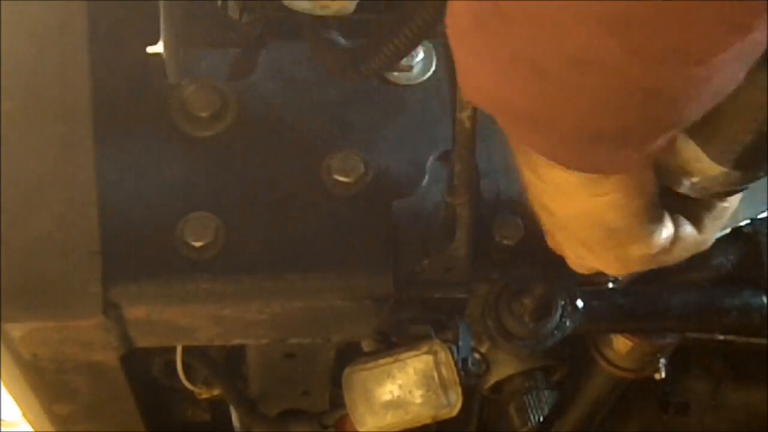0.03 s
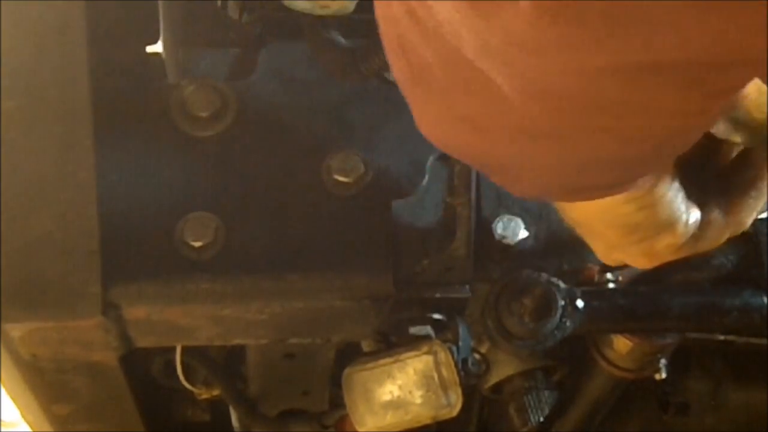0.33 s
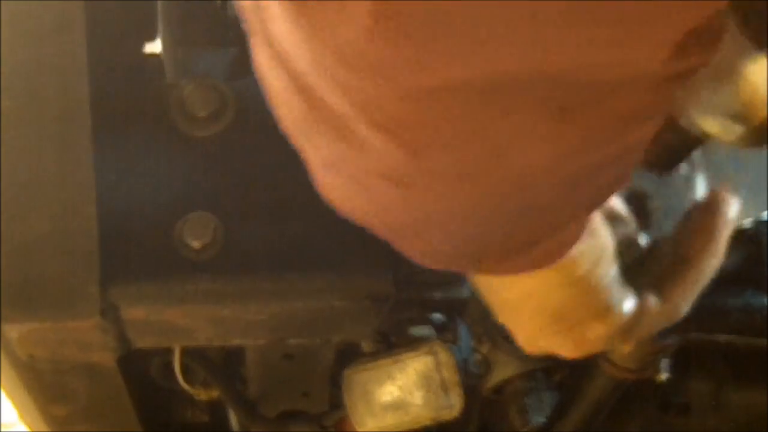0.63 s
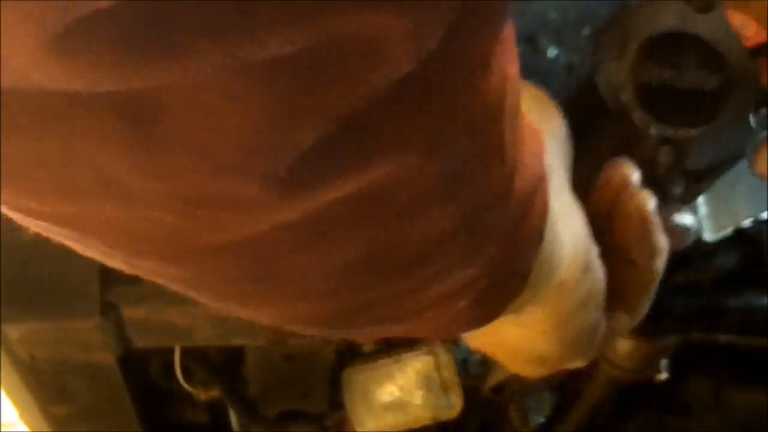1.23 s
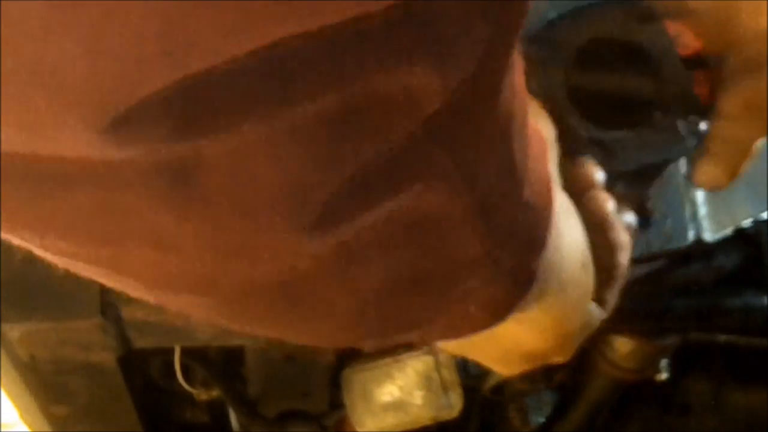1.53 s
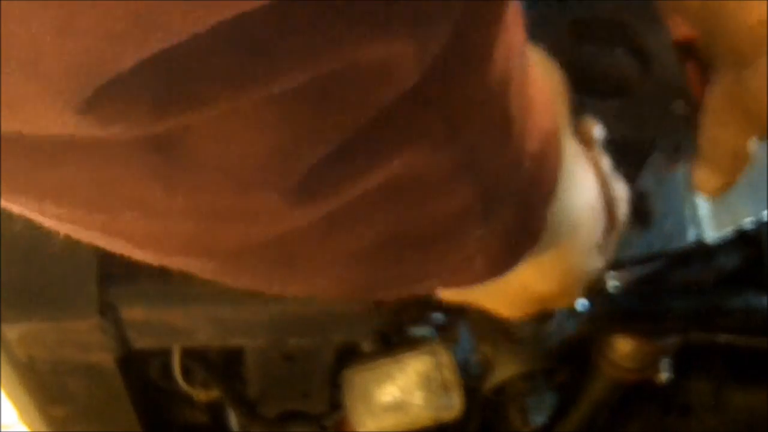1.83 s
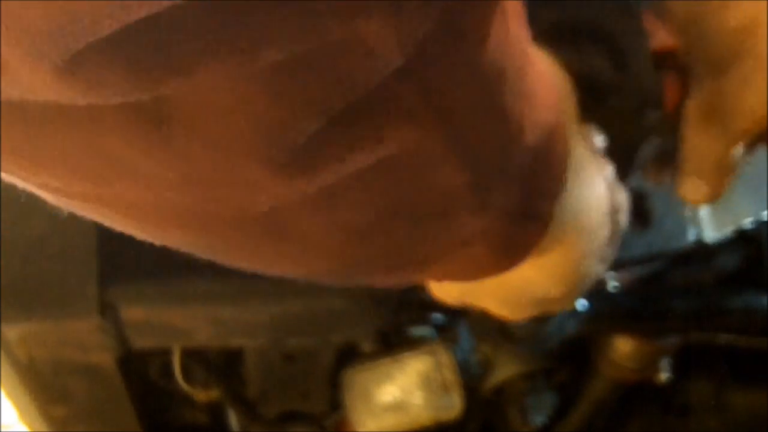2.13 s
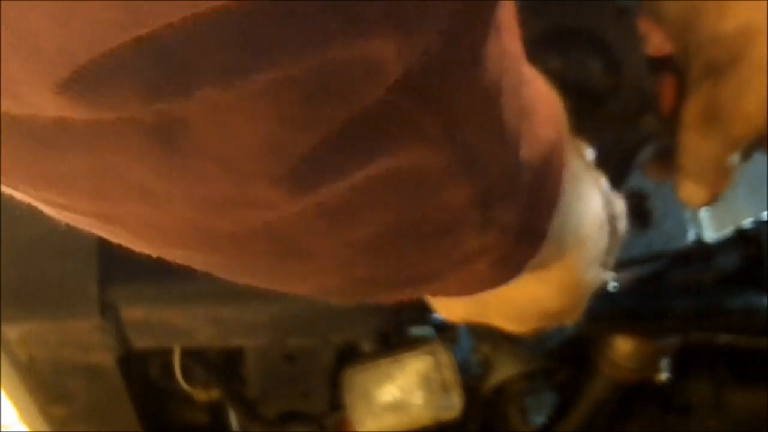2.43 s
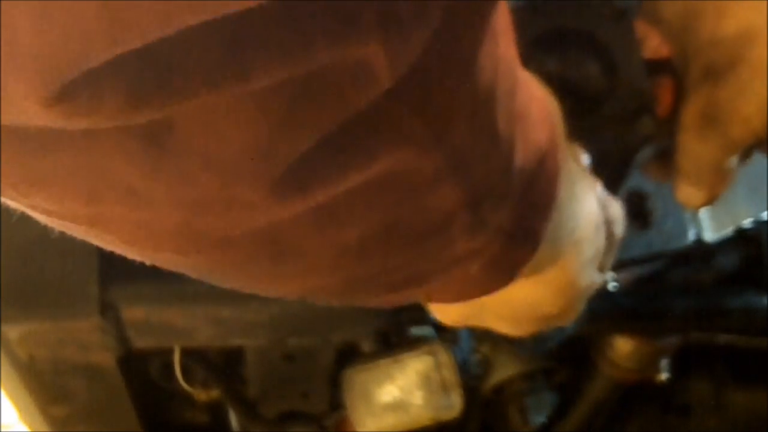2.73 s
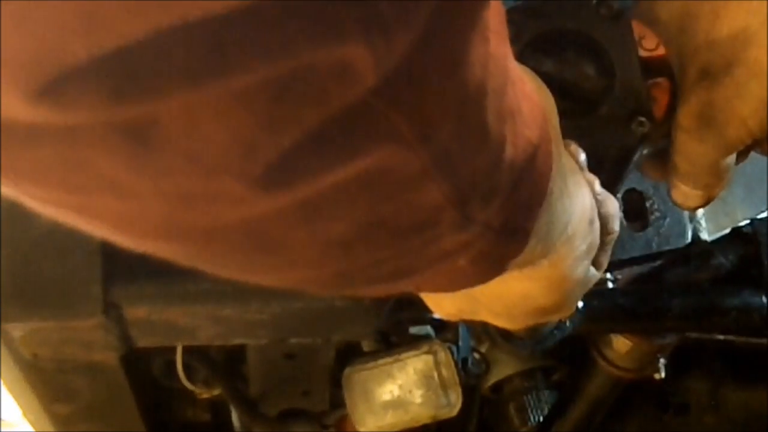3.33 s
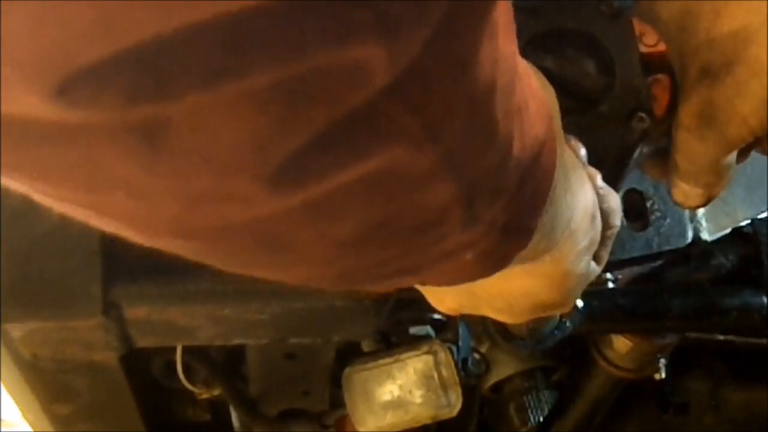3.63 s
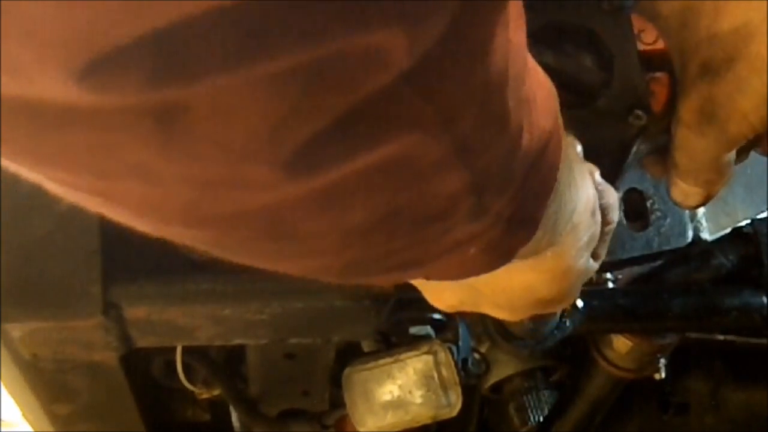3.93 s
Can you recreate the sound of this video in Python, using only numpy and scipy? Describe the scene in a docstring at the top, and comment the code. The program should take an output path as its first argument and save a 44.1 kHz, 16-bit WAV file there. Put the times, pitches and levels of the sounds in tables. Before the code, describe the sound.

An air impact wrench works close by under a car in a garage. First it scrapes over the floor while its hose hisses. A socket clinks sharply at 0.6 seconds, followed by a soft bump. Steel taps and knocks on the bolt and chassis from 1.5 to 2.1 seconds as the hiss fades. At 2.4 the trigger pops, air rushes, and about twelve blows a second continue until 4.

```python
"""Under a car in a garage, a small microphone close to an air wrench. The tool is dragged over the floor
while its hose coupling hisses. The socket clinks onto the drive, arm and tool bump softly, then steel
taps the bolt and knocks on the chassis. The hiss fades; at 2.36 s the trigger valve pops, air rushes
through the motor and the hammer strikes about twelve times a second to the end. Before each blow
the cam loads the bolt and shakes the underbody."""
import sys
import numpy as np
from scipy import signal
from scipy.fft import rfft, irfft
from scipy.io import wavfile
from scipy.ndimage import uniform_filter1d

SR = 44100
rng = np.random.default_rng(int(sys.argv[2]) if len(sys.argv) > 2 else 0)


def wav_out(sig):
    """Save sig, one row per channel (or a flat mono array), as 16-bit PCM at SR to the path in sys.argv[1]."""
    wavfile.write(sys.argv[1], SR, np.round(np.clip(np.atleast_2d(sig).T, -1, 1) * 32767).astype(np.int16))


N = 176400

# Room tone of the garage: freq_hz, gain_db
GARAGE_EQ = [(25, 0.5), (70, 3), (150, -7), (300, 0), (600, -13), (1200, -13), (3000, -11), (6000, -29.5),
             (10000, -23), (14500, -34), (16000, -48)]

# Sleeve brushes: start_s, level_db, rise_s, decay_s
SLEEVE_BRUSHES = [(.59, -42.5, 0.014, 0.048), (.66, -41, 0.024, 0.033), (1.0, -40.5, 0.011, 0.012)]
# Bumps of arm and tool: start_s, level_db, decay_s
SOFT_BUMPS = [(0.861, -27.5, 0.012), (1.005, -46, 0.013), (1.141, -49, 0.015)]
# Spectra of cloth and bump: freq_hz, gain_db
SLEEVE_EQ = [(60, -20), (250, -3.5), (450, -1), (620, -2), (900, -9.5), (2000, -15), (8000, -48)]
BUMP_EQ = [(25, -18), (75, 8), (170, -7), (310, 1.5), (480, -13), (700, -11.5), (1200, -28), (5000, -53)]
# Low ring after a bump: pitch_hz, level_db, t60_s
BUMP_MODES = [(66.3, -7, 1.8), (76, 8, 0.14), (98, 2, 0.13), (172.4, -6, .3), (305, 4, 0.21)]

# Leak at the coupling: time_s, dull_db, bright_db
HISS_LEVELS = [(0, -57, -68), (.045, -57, -61), (.065, -42, -39), (.15, -30, -37), (.22, -36, -49),
               (.27, -35, -32.5), (.33, -35.5, -38), (.43, -39, -47.5), (.48, -37, -49), (.55, -36, -39.5),
               (.645, -36.5, -39), (.69, -27.5, -30.5), (.85, -31, -29), (1.1, -32, -29.5),
               (1.5, -31.5, -31), (1.66, -30, -31), (1.8, -35, -41), (1.92, -35, -44), (2.02, -43, -59),
               (2.1, -49.5, -78)]
# Narrow band that swells as the coupling turns: time_s, level_db
HISS_BAND_LEVELS = [(.8, -75), (1.0, -40), (1.18, -38.5), (1.4, -39.5), (1.65, -42), (1.95, -72),
                    (2.05, -90)]
# Spectra of the dull, bright and narrow hiss: freq_hz, gain_db
HISS_DULL_EQ = [(100, -34), (600, -24), (1450, -19.5), (1700, -13), (2180, -8.5), (2340, 0), (2620, 0),
                (3100, 0.5), (4200, -3.5), (5000, -10.5), (7000, -18), (12000, -60)]
HISS_BRIGHT_EQ = [(500, -38), (1500, -15.5), (1700, -6), (2180, -6), (2350, -1), (4200, 1), (5000, -2),
                  (6300, -2), (7300, 0.5), (8600, -2), (9100, -13.5), (9700, -5), (10600, -9.5), (11700, 3),
                  (12250, 4.5), (12800, -17), (13200, -55), (15000, -81)]
HISS_BAND_EQ = [(4000, -43), (5200, -8), (5600, 0), (5850, -3), (6200, -20), (8000, -50)]
# Hollow collar of the coupling: pitch_hz, level_db, t60_s
COLLAR_MODES = [(2650, -0.5, 0.07), (2883, -1, 0.085), (3006, -3.5, 0.09), (3380, 1.5, 0.032),
                (3810, -1, 0.022), (4050, -5.5, 0.035), (9670, -6.5, 0.036)]

# Scraping on the floor, later on the bolt: time_s, level_db
DRAG_LEVELS = [(0, -27.5), (.05, -36), (.09, -32), (.11, -24.5), (.16, -23.5), (.18, -34), (.235, -26.5),
               (.31, -34.5), (.42, -45), (.6, -72), (1.88, -80), (1.91, -37), (1.94, -31), (2.0, -46),
               (2.05, -90)]
# The dragged tool catches: start_s, level_db
TOOL_SKIPS = [(0, -21.5), (.062, -19), (.093, -16), (.1, -18.5), (.109, -17), (.121, -21), (0.139, -15),
              (.149, -15), (0.156, -20), (0.166, -18.5), (0.229, -20.5), (0.274, -25.5), (.402, -32.5)]
# Spectra of scrape, rumble and skip: freq_hz, gain_db
DRAG_EQ = [(35, -62), (60, -21), (182, -22), (391, -9.5), (605, -13), (1360, -3.5), (1800, -7),
           (3320, -6.5), (4800, -15), (9040, -43), (11000, -31), (14300, -67), (22000, -120)]
RUMBLE_EQ = [(20, -7), (38, 4), (60, -10), (120, -22), (500, -60)]
SKIP_EQ = [(100, -21), (600, -9), (1300, 1.5), (2300, 1.5), (3400, -7.5), (4800, -10.5), (6500, -20.5),
           (14000, -53)]
# Ring of the tool body: pitch_hz, level_db, t60_s
TOOL_MODES = [(1142, -1, 0.063), (1388, 1, 0.065), (1523, -5, 0.043), (2280, -1, .035), (3400, -0.5, 0.09),
              (4820, -4, 0.028)]

# The socket meets the drive, then the bolt head: start_s, level_db
SOCKET_CLINKS = [(0.58, 0.5), (.5845, -16), (0.593, -14), (0.624, -33)]
BOLT_TAPS = [(1.538, -13.5), (1.585, -16)]
# Ring of socket and bolt: pitch_hz, level_db, t60_s
SOCKET_MODES = [(3825, 2, 0.015), (4100, -22, .02), (5800, -19, 0.009), (8457, -27, .008),
                (9540, -26, 0.044)]
BOLT_MODES = [(1810, -9.5, 0.043), (2912, 0, 0.054), (3060, -16, 0.11), (4150, -9, 0.037), (4620, -4, .02),
              (4740, -3.5, 0.034)]

# Steel on the chassis: start_s, clack_db, ping_db, rise_s, decay_s, boom_db, boom_hold_s
CHASSIS_KNOCKS = [(1.536, -28, -16, 0.0018, 0.0059, -36, 0.031),
                  (1.582, -25, -17, 0.0022, 0.0058, -29.5, 0.048),
                  (1.924, -20, -23, 0.0041, 0.022, -28, 0.056),
                  (2.114, -20.5, -36, 0.0051, 0.012, -31, 0.0076)]
# Spectra of a knock's clack, ping and boom: freq_hz, gain_db
KNOCK_EQ = [(60, -26), (300, -4.5), (700, -4.5), (1000, 2), (1400, 3.5), (2100, -0.5), (3000, -4.5),
            (4700, -16), (6200, -30), (9000, -49), (14000, -55)]
PING_EQ = [(100, -38), (1200, -11), (1800, -12), (2500, -3), (3000, 0), (4000, -1.5), (4800, 0.5),
           (6200, -14.5), (9000, -34), (14000, -43)]
BOOM_EQ = [(25, -42), (70, -29), (120, -21), (200, -10), (320, 3.5), (480, -4.5), (700, -6.5), (1000, -8.5),
           (2000, -17.5), (5000, -30), (10000, -55)]
# Chassis and underbody panels overhead: pitch_hz, level_db, t60_s
CHASSIS_MODES = [(574, -5.5, 0.25), (952, 4, 0.27), (1030, 2, 0.34), (1420, -12, .25), (1550, -9, 0.22),
                 (2390, -12, 0.16), (2780, -4, 0.22), (3280, -6, 0.13), (4540, -10, .12)]
PANEL_MODES = [(119.5, -16.5, .16), (203, -15, .13), (253, -7, .11), (280, -7, .12), (316, -9, .15),
               (376, 0, .2), (398, -7, .1), (581, -13, .12)]

# The wrench kicks in the hand: start_s, level_db
WRENCH_KICKS = [(2.362, -20), (2.426, -9.5), (2.697, -15), (3.653, -18), (3.927, -14.5)]
# Thump of the wrench and ring of its valve: pitch_hz, level_db, t60_s
THUMP_MODES = [(59, -11, 0.062), (116, -4.5, 0.046), (193, -1, 0.038), (299, 3, 0.038)]
VALVE_MODES = [(267, -8, 0.042), (1023, 3.5, 0.027), (1130, 0, 0.017), (1310, -0.5, 0.019),
               (1940, -13, 0.033), (2530, -10.5, 0.026)]
# Air through the motor: time_s, level_db
MOTOR_LEVELS = [(2.315, -69), (2.335, -35), (2.355, -28), (2.385, -24.5), (2.45, -29), (2.6, -29),
                (3.2, -28), (3.45, -28), (3.8, -29), (3.9, -25.5), (4.0, -27)]
# Spectra of valve spit and motor exhaust: freq_hz, gain_db
SPIT_EQ = [(1000, -28), (5000, -9), (9000, -2), (12500, 2), (14500, -14), (16000, -32)]
MOTOR_EQ = [(25, -16), (60, -1), (120, 1), (180, -9.5), (300, 3.5), (480, -3), (780, -8), (1100, 1.5),
            (1700, -1.5), (2700, 2.5), (4700, -2.5), (6800, -13.5), (9000, -23.5), (12000, -25),
            (14500, -54)]

# Hammer strokes: engage_s, load_db, blow_s, blow_db, decay_s, tilt_db, pitch_hz
HAMMER_STROKES = [(2.425, -21, 2.4786, -7.5, 0.0044, 1, 3730), (2.515, -22, 2.5604, -7.5, 0.0022, 1, 2810),
                  (2.602, -23.5, 2.6562, -6.5, .0038, -0.5, 2840),
                  (2.691, -21.5, 2.7435, -7, .004, 0, 2700), (2.778, -21.5, 2.8263, -8, 0.0024, 2, 3870),
                  (2.871, -27, 2.9036, -10.5, 0.0051, -0.5, 4690),
                  (2.932, -26.5, 2.978, -10, 0.0045, 0, 3020), (3.015, -23, 3.0523, -10, 0.0047, 0, 3470),
                  (3.084, -25, 3.1256, -9.5, 0.0037, 1, 3300), (3.159, -25.5, 3.2, -9, 0.002, 0, 4700),
                  (3.234, -25, 3.2733, -9.5, 0.0039, -0.5, 3090),
                  (3.31, -25.5, 3.3501, -8.5, 0.0037, 0.5, 4700), (3.394, -25, 3.4279, -8, 0.002, 2, 4730),
                  (3.48, -23.5, 3.5153, -10.5, 0.0044, 2, 2570),
                  (3.572, -23.5, 3.608, -10.5, 0.0047, 1, 4410),
                  (3.649, -21.5, 3.6899, -9.5, 0.0037, -2, 4590),
                  (3.738, -27.5, 3.7717, -12.5, 0.0049, -2, 2900),
                  (3.824, -24.5, 3.8625, -11, 0.0046, -3, 2420),
                  (3.924, -21.5, 3.9607, -13.5, 0.0032, -6.5, 2680)]
# Clacks of the loose socket: start_s, level_db
SOCKET_CLACKS = [(2.379, -19.5), (2.4048, -13.5), (2.431, -15.5), (2.4354, -13), (2.704, -25), (2.79, -21),
                 (2.945, -18.5), (3.018, -20), (3.027, -20), (3.092, -17.5), (3.102, -19), (3.164, -21),
                 (3.173, -17), (3.241, -17), (3.323, -18), (3.369, -24), (3.489, -18), (3.654, -15.5),
                 (3.662, -19), (3.7393, -14), (3.836, -15.5), (3.914, -27), (3.929, -15), (3.939, -18)]
# Socket and anvil ringing together: pitch_hz, level_db, t60_s
ANVIL_MODES = [(1234, -13, .08), (1369, -14, .1), (1734, -13, .08), (2426, -8, .14), (2590, -6, .06),
               (2790, -5, .05), (3020, -7, .08), (3365, -6, .07), (4050, -3, .025), (4690, 0, .04),
               (5400, -7, .02)]
# Spectra of panel shudder, cam thud, blow and its snap: freq_hz, gain_db
SHUDDER_EQ = [(25, -38), (70, -8), (130, -13), (180, -10), (300, -1), (420, -0.5), (550, -4), (800, -4.5),
              (1500, -14.5), (5000, -57)]
THUD_EQ = [(25, -46), (45, -21), (80, -2), (130, 2), (200, -1), (300, 6.5), (400, -5.5), (900, -14),
           (4000, -51)]
BLOW_EQ = [(30, -20), (150, -28), (400, -8.5), (800, -8), (1800, -4.5), (2700, -1.5), (4700, 0.5),
           (6500, -9.5), (9000, -24), (12000, -24.5), (16000, -54)]
SNAP_EQ = [(500, -38), (3000, -1), (5500, 2), (9000, -7.5), (12000, -16), (16000, -19)]

ROOM_DB, ROOM_T60_S, ROOM_TREBLE_T60_S, ROOM_GAP_S = -7, 0.7, 0.41, 0.00636
STRIKE_RISE_S, BOOM_RISE_S, BOOM_DECAY_S = 0.00055, 0.012, 0.031
HISS_FLUTTER_DB = 0.76
LEAK_S, POP_S, POP_RISE_S = 2.328, 2.3625, 0.0024
RATTLE_PER_S, RATTLE_SPREAD_DB = 450, 2.2
SHUDDER_RISE_S, SHUDDER_HOLD_S, SHUDDER_FALL_S, SHUDDER_SWELL_DB_PER_S = 0.0037, 0.021, 0.0043, 280
BLOW_RISE_S, BLOW_SPLIT_HZ, BLOW_TONE_DB, BLOW_TONE_T60_S = 0.00079, 3340, -6, 0.039
NOTCH_HZ, NOTCH_WIDTH_HZ, CEILING, TOP_HZ = 7820, 700, 1.02, 16000


def amp(db):
    """Decibels to gain."""
    return 10 ** (np.asarray(db) / 20)


def seconds(length=N):
    """The time axis."""
    return np.arange(length) / SR


def noise():
    """White noise."""
    return rng.standard_normal(N)


def split_noise(order, hz):
    """Two noises, one below and one above a crossover."""
    filters = (signal.butter(order, hz, kind, fs=SR, output="sos") for kind in ("low", "high"))
    return [signal.sosfilt(sos, noise()) for sos in filters]


def clicks(per_s, spread_db):
    """Random small contacts of uneven size."""
    x = (rng.random(N) < per_s / SR) * np.sign(noise()) * amp(spread_db * noise())
    return x / np.std(x)


def fader(rows, column=1):
    """Gain along a table of times and levels."""
    rows = np.array(rows)
    return amp(np.interp(seconds(), rows[:, 0], rows[:, column]))


def burst(start_s, rise_s, decay_s):
    """Envelope with a straight attack and an exponential release."""
    t = seconds() - start_s
    return np.clip(t / rise_s, 0, 1) * np.exp(-np.clip((t - rise_s) / decay_s, 0, 20))


def through(x, response):
    """Pass a sound through a response scaled to unit energy."""
    return signal.fftconvolve(x, response / np.sqrt(np.sum(response ** 2)))[:N]


def eq(x, points, size=4096):
    """Minimum-phase filter of unit energy; the points set only its shape."""
    hz, db = np.array(points).T
    bins_hz = np.arange(size // 2 + 1) * SR / size
    shape_db = np.interp(np.log(bins_hz + 1), np.log(hz), db)
    cepstrum = irfft(np.log(amp(shape_db)))
    cepstrum[1:size // 2] *= 2
    cepstrum[size // 2 + 1:] = 0
    return through(x, irfft(np.exp(rfft(cepstrum))))


def ring(modes):
    """One second of decaying modes, alternating in sign so that little bass leaks below them."""
    t = seconds(SR)
    partials = sum((-1) ** k * amp(db) * np.cos(2 * np.pi * hz * t) * np.exp(-np.log(1000) * t / t60)
                   for k, (hz, db, t60) in enumerate(modes))
    lowest_hz = min(mode[0] for mode in modes)
    return partials * np.clip(t * lowest_hz * 2, 0, 1)


def strikes(modes, rows):
    """The modes struck once for each row of start_s, level_db."""
    t = seconds(SR)
    note = ring(modes) * np.clip(t / STRIKE_RISE_S, 0, 1)
    return sum(amp(db) * np.interp(seconds() - at, t, note, right=0) for at, db in rows)


def room_tone():
    """The garage's faint, steady background."""
    return amp(-50) * eq(noise(), GARAGE_EQ)


def reflections(x):
    """Sound bounces between floor and underbody; the treble dies first."""
    t = seconds()
    low, high = split_noise(2, hz=2200)
    tail = low * amp(-60 * t / ROOM_T60_S) + high * amp(-60 * t / ROOM_TREBLE_T60_S)
    return through(x, (tail * (t > ROOM_GAP_S))[:SR])


def sleeve():
    """Cloth brushes past."""
    rub = sum(amp(db) * burst(at, rise, decay) for at, db, rise, decay in SLEEVE_BRUSHES)
    return eq(rub * noise(), SLEEVE_EQ)


def bumps():
    """Soft bumps of arm and tool leave a low drone in the body."""
    push = sum(amp(db) * burst(at, 0.0015, decay) for at, db, decay in SOFT_BUMPS)
    drone = strikes(BUMP_MODES, [(at, db) for at, db, _ in SOFT_BUMPS])
    return eq(push * noise(), BUMP_EQ) + amp(-7.5) * drone


def coupling_hiss():
    """The coupling leaks, now duller, now brighter, and its hollow collar resonates."""
    flutter = uniform_filter1d(noise(), size=1500)
    dull = eq(fader(HISS_LEVELS) * noise(), HISS_DULL_EQ)
    bright = eq(fader(HISS_LEVELS, column=2) * noise(), HISS_BRIGHT_EQ)
    collar = through(eq(fader(HISS_LEVELS) * noise(), HISS_BRIGHT_EQ), ring(COLLAR_MODES))
    band = eq(fader(HISS_BAND_LEVELS) * noise(), HISS_BAND_EQ)
    return (dull + bright + band + amp(-7.5) * collar) * amp(HISS_FLUTTER_DB * flutter / np.std(flutter))


def drag():
    """The tool scrapes along in dense catches, at first over a faint rumble."""
    rumble = eq(burst(-0.061, rise_s=0.12, decay_s=0.25) * noise(), RUMBLE_EQ)
    scrape = fader(DRAG_LEVELS) * clicks(per_s=1800, spread_db=1.5)
    return eq(scrape, DRAG_EQ) + amp(-49.5) * rumble


def skips():
    """The dragged tool catches in a quick run of knocks that ring its body."""
    contact = noise() * sum(amp(db) * burst(at, 0.00088, decay_s=0.0033) for at, db in TOOL_SKIPS)
    return eq(contact, SKIP_EQ) + amp(-3.5) * through(contact, ring(TOOL_MODES))


def clinks():
    """The socket snaps onto the drive and bounces, then taps the bolt."""
    tick = sum(amp(db - 15.5) * burst(at, 0.0002, decay_s=0.0015) for at, db in SOCKET_CLINKS)
    ringing = strikes(SOCKET_MODES, SOCKET_CLINKS) + strikes(BOLT_MODES, BOLT_TAPS)
    return ringing + eq(tick * noise(), BLOW_EQ)


def panels():
    """The underbody panels overhead, shaken at an even level."""
    shake = through(noise(), ring(PANEL_MODES))
    return shake / np.sqrt(uniform_filter1d(shake ** 2, size=1100) + 0.012)


def knocks():
    """Steel meets the chassis: a clack, a ping, a ring and a slower boom of the panels."""
    clack = ping = swell = 0
    for at, clack_db, ping_db, rise, decay, boom_db, hold in CHASSIS_KNOCKS:
        contact = burst(at, rise, decay)
        clack += amp(clack_db) * contact
        ping += amp(ping_db) * contact
        t = seconds() - at
        release = np.exp(-np.clip((t - BOOM_RISE_S - hold) / BOOM_DECAY_S, 0, 20))
        swell += amp(boom_db) * np.clip(t / BOOM_RISE_S, 0, 1) * release
    clack *= noise()
    boom = swell * (amp(-6) * panels() + amp(-2) * eq(noise(), BOOM_EQ))
    chassis = amp(-10) * through(clack, ring(CHASSIS_MODES))
    return eq(clack, KNOCK_EQ) + eq(ping * noise(), PING_EQ) + chassis + boom


def kicks():
    """The wrench jerks against the hand with a low thump."""
    return strikes(THUMP_MODES, WRENCH_KICKS)


def trigger():
    """Air whistles and spits past the opening valve, then pops into the housing."""
    valve = ring(VALVE_MODES)
    leak = amp(-21) * burst(LEAK_S, POP_S - LEAK_S, decay_s=0.0039) * noise()
    spit = amp(-37) * burst(LEAK_S, POP_S - LEAK_S, decay_s=0.0079) * noise()
    t = seconds() - POP_S
    pop = np.interp(t, seconds(SR), valve) * np.clip(t / POP_RISE_S, 0, 1)
    return through(leak, valve) + eq(spit, SPIT_EQ) + amp(-2.5) * pop


def motor():
    """Exhaust air rushes out while the loose socket rattles and rings."""
    flow = fader(MOTOR_LEVELS)
    rattle = flow * clicks(RATTLE_PER_S, RATTLE_SPREAD_DB)
    rush = eq(flow * noise() + amp(-5.5) * rattle, MOTOR_EQ)
    return rush + amp(-9) * through(rattle, ring(ANVIL_MODES))


def cam_shudder():
    """The cam catches with a thud, and the panels shake ever harder until the blow frees them."""
    t = seconds()
    load = thud = 0
    for engage_s, load_db, blow_s, *_ in HAMMER_STROKES:
        swell_db = -SHUDDER_SWELL_DB_PER_S * np.clip(blow_s - SHUDDER_HOLD_S - t, 0, 1)
        attack = np.clip((t - engage_s) / SHUDDER_RISE_S, 0, 1)
        release = np.clip((blow_s - t) / SHUDDER_FALL_S + 1, 0, 1)
        load += amp(load_db + swell_db) * attack * release
        thud += amp(load_db - 3.5) * burst(engage_s, SHUDDER_RISE_S, decay_s=0.0049)
    shake = amp(-2.5) * panels() + amp(-11.5) * eq(noise(), SHUDDER_EQ)
    return load * shake + eq(thud * noise(), THUD_EQ)


def hammer():
    """The hammer hits the anvil, each blow with its own brightness and ring; the socket clacks between."""
    catch = dull = bright = snap = tone = 0
    for engage_s, load_db, blow_s, blow_db, decay_s, tilt_db, pitch_hz in HAMMER_STROKES:
        catch += amp(load_db - 4.5) * burst(engage_s, rise_s=0.0098, decay_s=0.024)
        blow = amp(blow_db) * burst(blow_s, BLOW_RISE_S, decay_s)
        dull += amp(-tilt_db) * blow
        bright += amp(tilt_db) * blow
        snap += amp(blow_db + tilt_db - 14) * burst(blow_s, BLOW_RISE_S, decay_s=0.0011)
        tone += strikes([(pitch_hz, BLOW_TONE_DB, BLOW_TONE_T60_S)], [(blow_s, blow_db)])
    low, high = split_noise(3, BLOW_SPLIT_HZ)
    clack = noise() * sum(amp(db) * burst(at, BLOW_RISE_S, decay_s=0.0029) for at, db in SOCKET_CLACKS)
    rattle = catch * clicks(RATTLE_PER_S, RATTLE_SPREAD_DB)
    steel = dull * low + bright * high + clack + rattle
    anvil = amp(-13.5) * through(steel, ring(ANVIL_MODES))
    return eq(steel, BLOW_EQ) + anvil + eq(snap * noise(), SNAP_EQ) + tone


def scene():
    """Mono, under the car: wrench and socket are close to the microphone, drier than the handling."""
    wrench = hammer() + cam_shudder() + motor() + trigger() + kicks()
    handling = knocks() + drag() + bumps() + sleeve()
    socket = clinks() + skips()
    echo = amp(ROOM_DB) * reflections(handling + amp(-3.5) * wrench + amp(-5) * socket)
    return (wrench + handling + socket + coupling_hiss() + echo + room_tone())[None]


def record(dry):
    """The small microphone's port notches the treble; peaks are rounded and the top is cut."""
    b, a = signal.iirnotch(NOTCH_HZ, NOTCH_HZ / NOTCH_WIDTH_HZ, fs=SR)
    notched = signal.lfilter(b, a, signal.lfilter(b, a, dry))
    rounded = notched / (1 + (notched / CEILING) ** 8) ** (1 / 8)
    return signal.sosfilt(signal.ellip(8, .2, 80, TOP_HZ, fs=SR, output="sos"), rounded)


dry = scene()
out = record(dry)
wav_out(out)
```